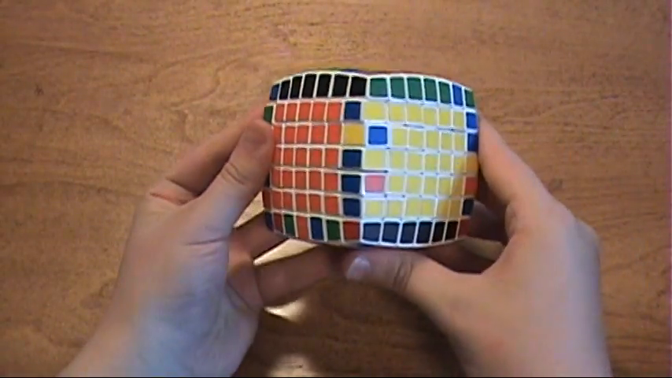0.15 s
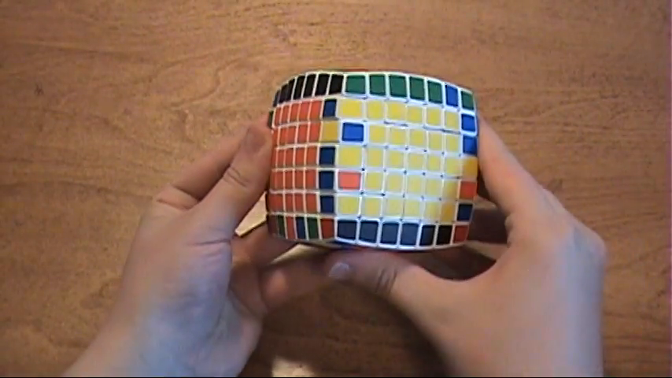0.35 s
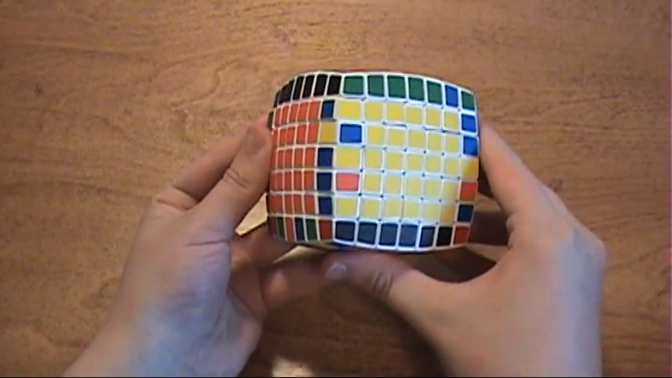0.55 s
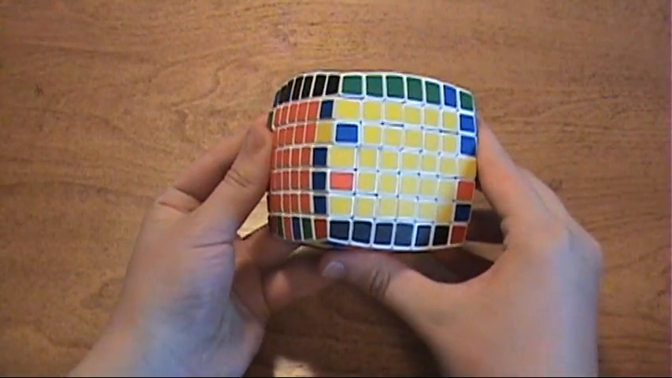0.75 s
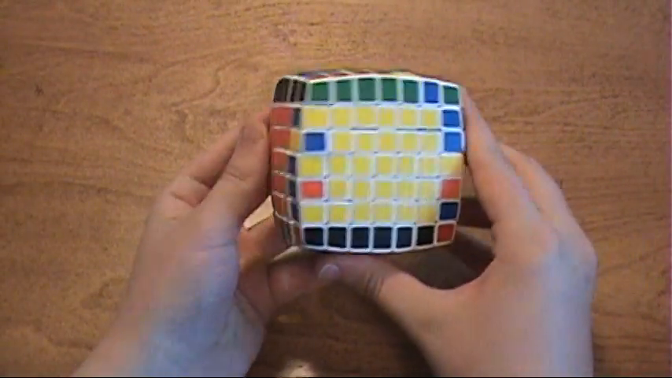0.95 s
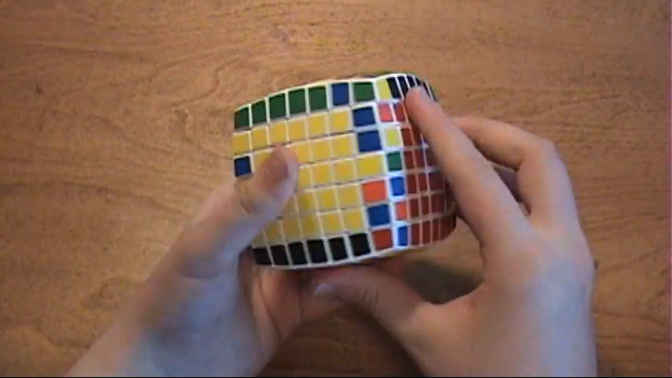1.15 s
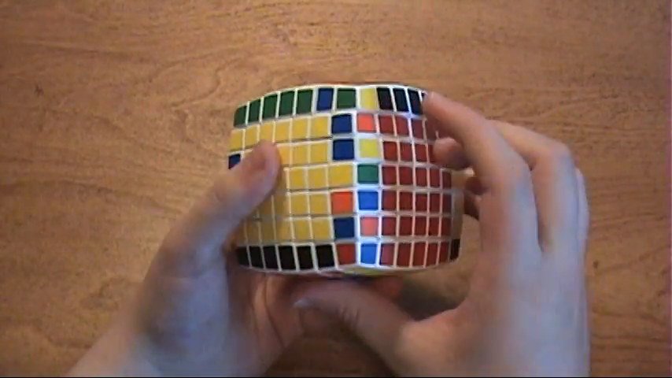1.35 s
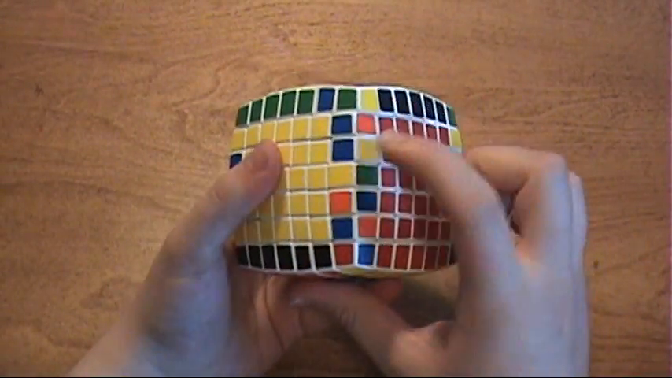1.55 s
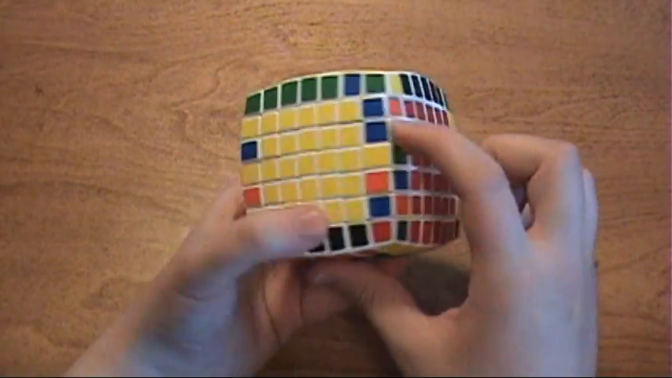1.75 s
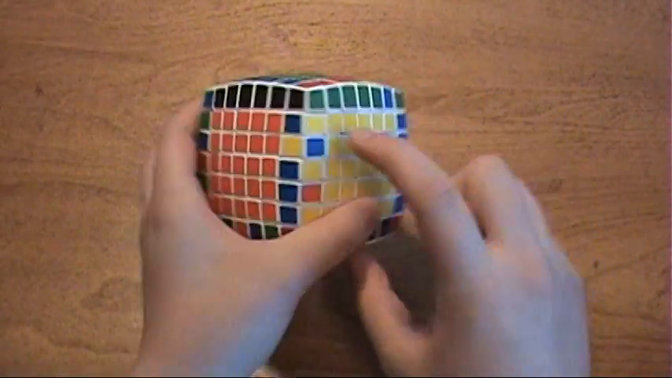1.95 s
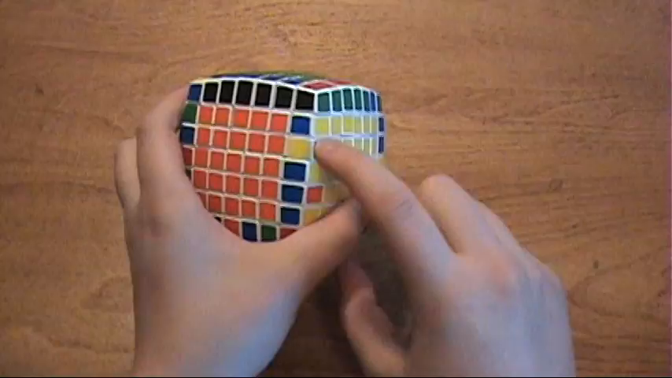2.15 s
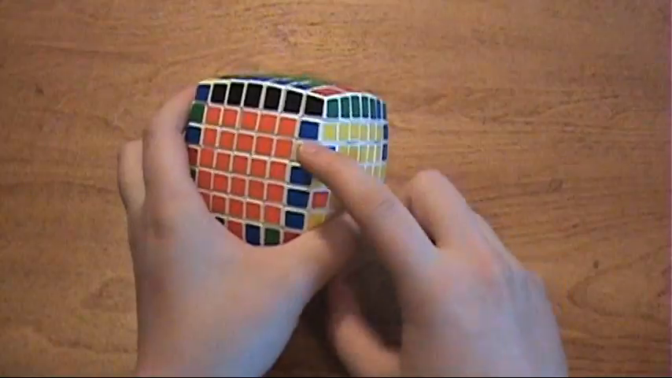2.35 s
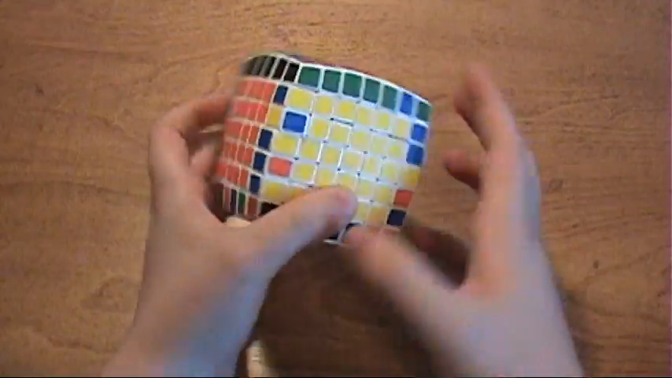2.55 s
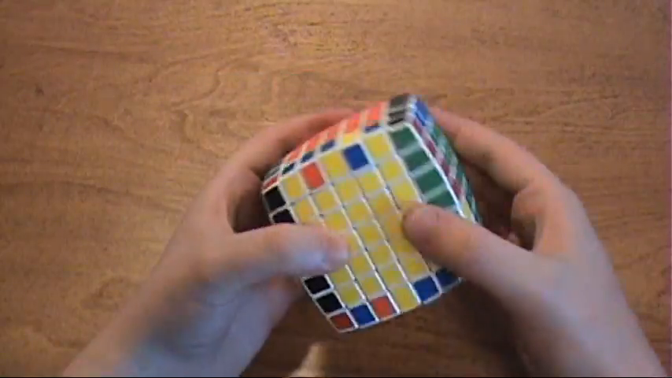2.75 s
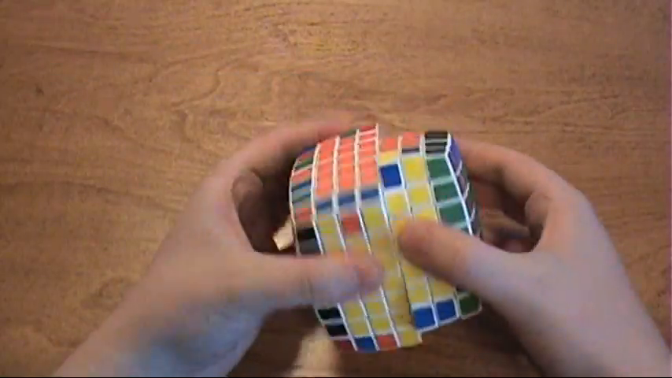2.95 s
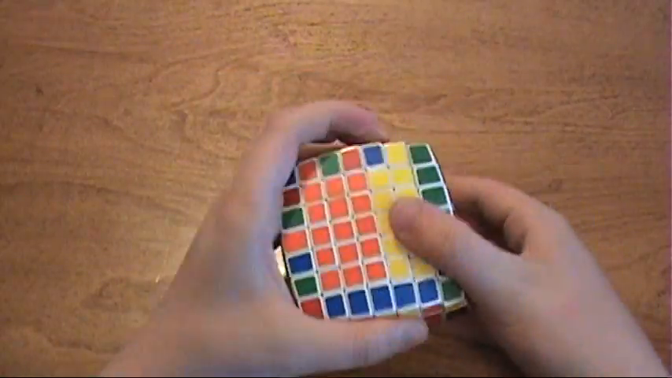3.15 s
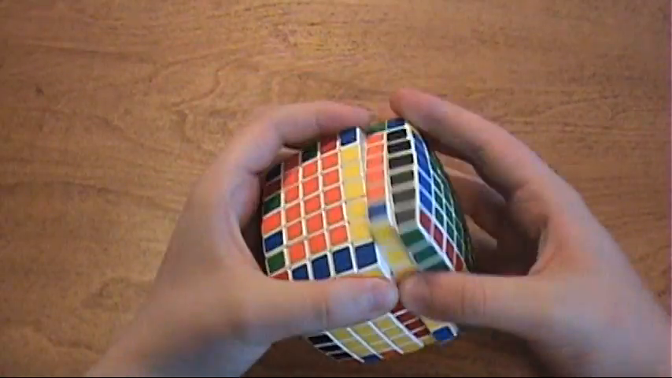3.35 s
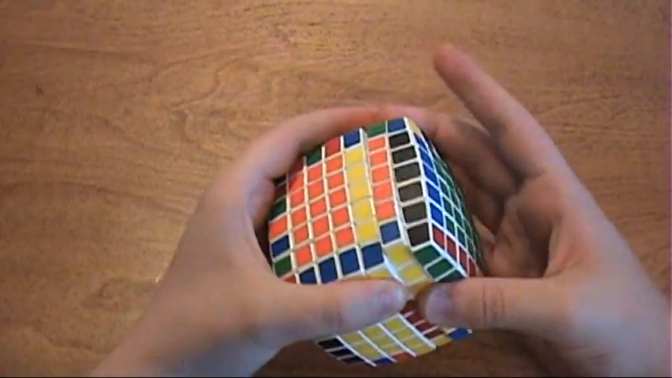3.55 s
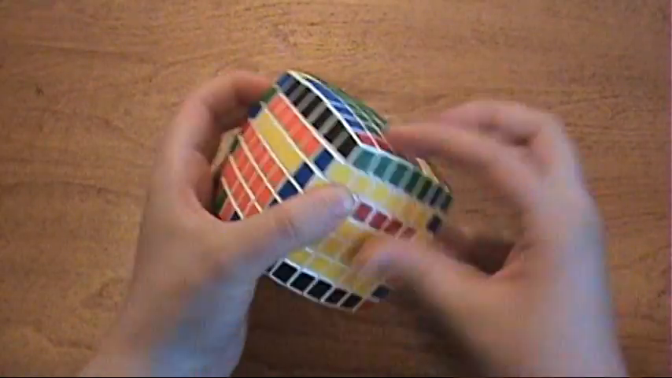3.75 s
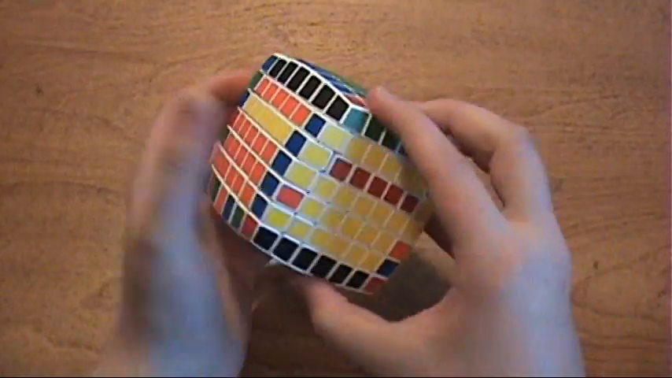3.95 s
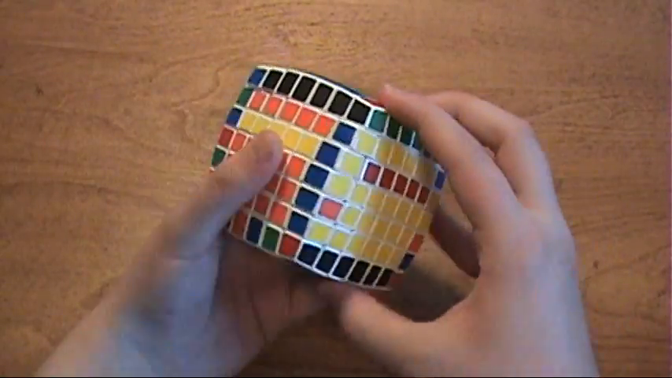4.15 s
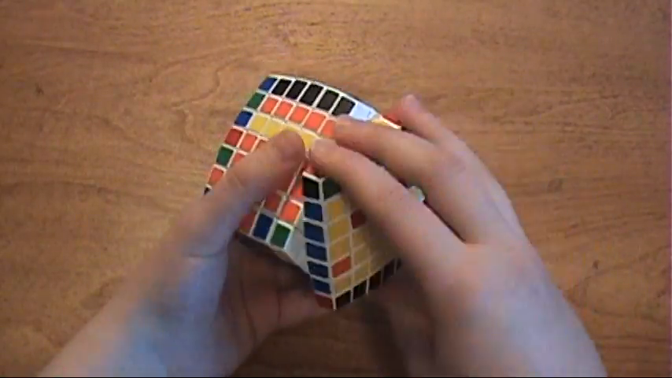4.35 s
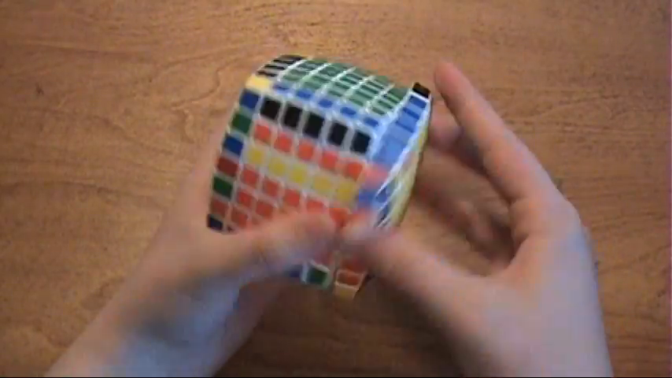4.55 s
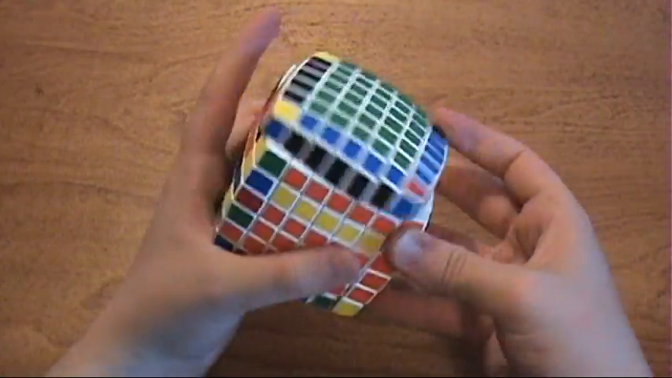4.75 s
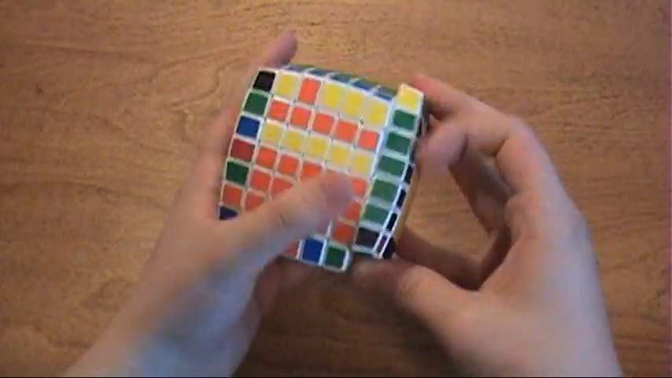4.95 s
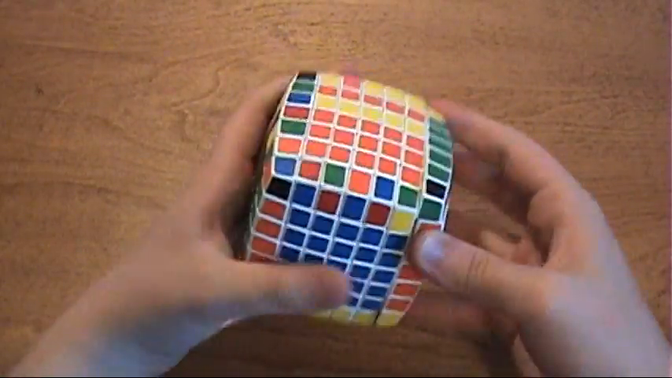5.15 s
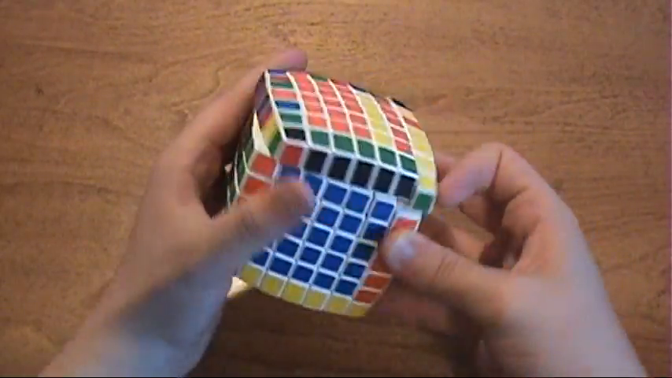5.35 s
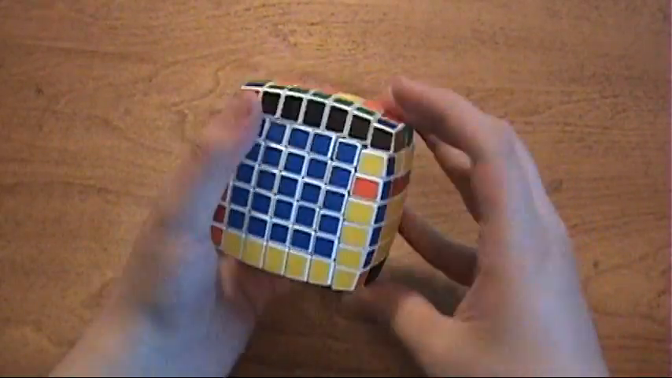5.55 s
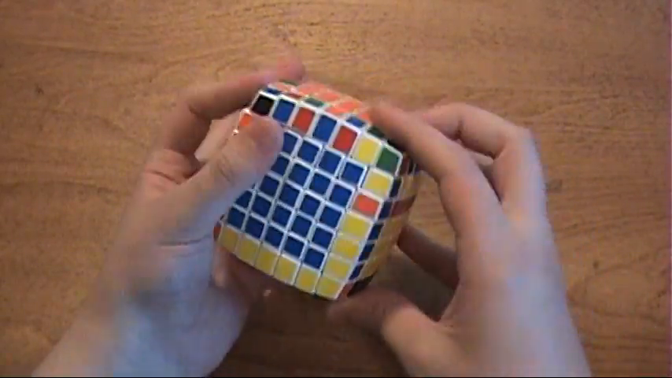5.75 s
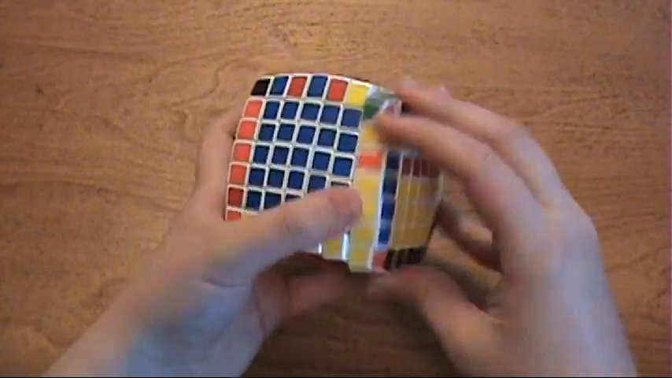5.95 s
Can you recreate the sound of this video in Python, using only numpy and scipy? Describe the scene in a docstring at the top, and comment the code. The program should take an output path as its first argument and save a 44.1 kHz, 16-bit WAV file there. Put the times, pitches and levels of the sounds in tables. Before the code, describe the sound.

Hollow, dry plastic clatter from a twisty cube, recorded near in stereo. Isolated clicks and light handling lead into crowded flurries of tiny contacts as layers grind round, with soft finger bumps between them. The strongest cracks fall late, followed by somewhat gentler rattles. A short room reflection softens each clack, over constant background hiss, low rumble, weak machine hum and a faint motor whine.

```python
"""A many-layered plastic puzzle cube is turned by hand, heard close up in a small room.
It begins with scattered soft clacks and a first sharp one; from 2.5 s the turning gets busy and fingers bump
the cube softly. The clacks are loudest from about 4.5 to 5.5 s, then ease off a little.
Each clack is a flurry of tiny contacts, a turning layer rattles many pieces, and the hollow body colours both.
The room answers with fading noise; hiss, rumble, a faint machine hum and a whine run throughout."""
import sys
import numpy as np
from scipy import signal
from scipy.fft import rfft, irfft, next_fast_len
from scipy.io import wavfile
from scipy.ndimage import uniform_filter1d, map_coordinates

SR = 44100
rng = np.random.default_rng(int(sys.argv[2]) if len(sys.argv) > 2 else 0)


def pcm_store(signal):
    """Save signal as 16-bit PCM."""
    levels = np.round(np.clip(np.atleast_2d(signal), -1, 1) * 32767)
    wavfile.write(sys.argv[1], SR, levels.astype(np.int16).T)


N = 264159
FRAME = 2048  # samples in the sound of one struck piece
LEAD = 512  # samples kept ahead of a clack's main blow, also the longest path between pieces

# Pieces knocking together. Each row: time of the main blow in seconds, level in dB averaged over 8 ms,
# hollow knock in dB, bright snap in dB, length of the flurry in ms.
CLACKS = [(0.0885, -42.5, -2, 0, 2.4), (0.134, -51, 3, -2, 1.6), (0.1987, -45, 4, -10, 1.4),
          (0.231, -51.5, -1, -13, 0.7), (0.2937, -29, 5, -1, 2.05), (0.6105, -38.5, 4, -1, 1.2),
          (0.6155, -35.5, 8, 7, 1.2), (0.6206, -30, 8, 3.5, 3.6), (0.8739, -39, 10, 0, 1.1),
          (0.9567, -40.5, 4.5, 9, 0.74), (1.0129, -41.5, 8, 17, 0.5), (1.0208, -40, -5, 8, 0.54),
          (1.0515, -48.5, 8, -1, 1.1), (1.0633, -41.5, -3, -5, 1.3), (1.0785, -45.5, -10, 10, 1.1),
          (1.159, -44.5, -3, 3, 1.6), (1.1833, -42.5, -8, 9, 0.65), (1.211, -51, 15, 11, 1.3),
          (1.771, -48.5, 4, 3, 1.9), (1.8803, -49, -13, 6, 1), (1.8957, -34, 13, 5, 1.3),
          (1.9154, -34.5, 3, 5.5, 0.67), (1.9598, -44, -8, -5, 0.8), (1.9834, -36.5, 8.5, -7, 2.2),
          (2.0207, -36.5, 0, -17, 2.7), (2.227, -53, 13, -8, 1.6), (2.5154, -37.5, 10, 22.5, 3.3),
          (2.53, -47.5, -4, 5, 0.83), (2.7568, -42.5, 2.5, -9, 2.7), (2.7965, -34, 3, 3, 1.3),
          (2.804, -33, 2, 5, 2.2), (2.909, -38, 15, 10, 0.57), (2.924, -38, 11, -1, 1.47),
          (2.9432, -33.5, -2, -26, 1.4), (2.9552, -28, 4, 2.5, 2), (3.0065, -29, -6, -24, 0.81),
          (3.0186, -27, 4, -5, 1.6), (3.0536, -28.5, 6, -4, 0.35), (3.0668, -27, 0, -10, 0.52),
          (3.0913, -30, 5, 2, 1.6), (3.1237, -34, 7, 9, 0.5), (3.2107, -32.5, 8, 0, 2.5),
          (3.2558, -26, 2, 8, 0.92), (3.277, -30, -8, 22, 0.8), (3.361, -40.5, 2, 13, 0.2),
          (3.425, -32.5, -6, -16, 3.4), (3.4692, -44, 3, -26, 1.16), (3.531, -34, -11, 7, 0.32),
          (3.5433, -38.5, 6, -11, 1.4), (3.6313, -32, -6, 4, 1.3), (3.6413, -32, -15, -1, 0.57),
          (3.691, -38.5, 3, 7, 0.7), (3.775, -38, -5, -12, 0.7), (3.8124, -38, -4, -3, 0.96),
          (3.8254, -43, 4, -1, 0.7), (3.8607, -38.5, 5, -13, 0.7), (3.8935, -39.5, 9, -22, 1.7),
          (3.913, -38, 0, 0, 1.04), (3.976, -39, 1, -5, 0.41), (4.025, -37, -9, 10, 1.1),
          (4.0347, -31.5, 4.5, 10, 1.3), (4.0984, -40, 6, -2, 0.96), (4.1223, -42, 3, -12, 0.55),
          (4.1412, -25, 7, 7, 2.2), (4.1995, -31, -5, -8, 2.2), (4.2048, -31, -2, -6, 0.89),
          (4.2944, -27, 0, 4, 1.2), (4.3249, -34.5, 4, 4, 1.21), (4.403, -43, 14, -5, 1.87),
          (4.479, -35, 13, 6, 3), (4.5037, -33.5, 16, 7, 3.3), (4.539, -24, -9, 5, 0.49),
          (4.5434, -21.5, 2, 2, 5.3), (4.5648, -21, -0.5, 1.5, 5.6), (4.5886, -25.5, -3, 3, 1),
          (4.6118, -24.5, -20, -3, 0.41), (4.6394, -22, -20, 3.5, 1.1), (4.754, -39, -1, -19, 0.4),
          (4.778, -36, -10, -1, 0.37), (4.8205, -18.5, -0.5, 5, 1.8), (4.8724, -23.5, -14, 12, 0.7),
          (4.881, -18.5, -2.5, 10.5, 0.9), (4.8927, -25, -3, 11, 1.4), (4.9029, -31, 1, -11, 1.2),
          (4.9175, -23.5, -14, 11, 1.2), (4.9248, -24, -9, 7, 1.5), (4.9311, -20.5, -7, 14, 1.2),
          (4.964, -27.5, -5, 2, 1.1), (5.011, -29, 0.5, -1, 0.7), (5.0383, -30.5, -1.5, -10, 0.9),
          (5.1062, -46, 0, -6, 0.71), (5.1846, -41, 8, -4, 0.9), (5.2184, -35.5, -8, -1, 1.04),
          (5.2489, -36, 5.5, 2, 1.06), (5.2963, -30.5, 2, 5, 2.2), (5.3256, -28.5, -7, 10, 1.97),
          (5.3902, -17, -4.5, 3.5, 1.6), (5.4622, -19.5, -3, 6.5, 1.02), (5.492, -30, -7, -8, 0.63),
          (5.5094, -31, -13, -3, 1.4), (5.5268, -29.5, -3, -14, 0.59), (5.5802, -33, 5, -10, 4.6),
          (5.6188, -31.5, 0.5, 9, 0.8), (5.6793, -27, 8, -1, 3.5), (5.7743, -30.5, 3.5, 2.5, 2.8),
          (5.8015, -36, 0, -6, 3), (5.8526, -35.5, 9, -2, 0.85), (5.89, -32.5, 3, 16, 0.53),
          (5.914, -36, -3, -8, 2.7), (5.9632, -29, -9, -8, 1.8), (5.9809, -28.5, -4, 9, 1)]


def clacks(rows, rise=0.67, strike=0.87):
    """Contacts crowd up to one main blow and thin out after it, each making a piece ring."""
    out = np.zeros(N)
    hz, colours = piece_colours(own_db=2.5, count=len(rows))
    knock = 1 / (1 + (np.log2((hz + 1) / 740) / 0.86) ** 4)  # a square blow drives the cube's lowest resonances
    snap = 1 - 1 / (1 + (hz / 5500) ** 4)  # a hard edge adds treble
    times, levels, knocks, snaps, lengths = np.transpose(rows)
    colours = colours + np.outer(knocks, knock) + np.outer(snaps, snap)
    pieces = scattered(causal(colours), spread_s=0.0003893)
    ms = (np.arange(FRAME) - LEAD) * 1000 / SR  # time from the main blow
    flurries = contacts(rate=5000, scatter_db=4.5, shape=(len(rows), FRAME))
    for start, db, length, piece, flurry in zip(times, levels, lengths, pieces, flurries):
        distance = np.maximum(ms, -ms / rise)  # the build-up is quicker than the thinning out
        force = flurry * np.exp(-distance / (2 * max(length, .1)))
        force /= np.linalg.norm(force) + 1e-12
        force[LEAD] += strike / (1 + length ** 2)  # short clacks are nearly one clean blow
        ring = signal.fftconvolve(even(force), piece)
        ring *= np.sqrt(.008 * SR) / np.linalg.norm(ring)  # same energy as 8 ms at rms 1
        add(out, amp(db) * ring, round(start * SR) - LEAD)
    return out


def contacts(rate, scatter_db, shape):
    """Random tiny impacts, rate a second, pushing either way with varying but bounded size."""
    hit = rng.random(shape) < rate / SR
    direction = np.sign(rng.standard_normal(shape))
    size = amp(scatter_db * np.clip(rng.standard_normal(shape), -2, 1.6))
    return hit * direction * size


def even(force):
    """Hard contacts push all broad bands alike, so the colour comes from the piece that is struck."""
    spectrum = rfft(force)
    broad_power = uniform_filter1d(np.abs(spectrum) ** 2, size=36)
    return irfft(spectrum / np.sqrt(np.abs(broad_power) + 1e-12))


# Resonances of the hollow cube. Each row: frequency in Hz, width in Hz, height in dB above the broad colour.
CAVITIES = [(405, 99, 3), (599, 107, 7.5), (875, 174, 11.5), (1005, 137, 8), (1440, 180, 3.5),
            (1826, 520, 4), (2460, 350, 2), (3180, 700, 2.5), (4400, 1370, 4), (5440, 300, 1),
            (6970, 2000, 4.5), (8480, 930, 2)]
# Broad colour of the plastic. Each row: frequency in Hz, level in dB per Hz.
PLASTIC = [(60, -48), (200, -12.5), (300, -12.5), (450, -5.5), (750, -8), (1250, -3), (2000, -1),
           (4300, -1), (6200, -7), (10000, -7), (12500, -14), (15000, -23.5), (16500, -43)]


def piece_colours(own_db, count):
    """Spectra of single pieces in dB: the cube's shared resonances plus narrow ones of each piece's own."""
    hz = np.fft.rfftfreq(FRAME, 1 / SR)
    body = along(PLASTIC, hz) + resonances(CAVITIES, hz)
    return hz, body + own_db * ripple(count)


def scattered(responses, spread_s, slow_hz=1200):
    """Each frequency finds its own way out between the pieces; the heavy body answers later than small parts."""
    hz = np.fft.rfftfreq(FRAME, 1 / SR)
    low_is_late = 1 + 2 / (1 + (hz / slow_hz) ** 2)
    delay_s = spread_s * (.5 + np.abs(ripple(len(responses)))) * low_is_late
    phase = -2 * np.pi * np.cumsum(delay_s, axis=1) * SR / FRAME  # adding up delays over frequency gives phase
    paths = irfft(np.exp(1j * phase))[:, :LEAD]
    return signal.fftconvolve(responses, paths, axes=1)[:, :FRAME]


# Parts of the cube that are flicked and ring at their own pitch.
# Each row: start in seconds, starting level in dB, pitch in Hz.
PINGS = [(0.292, -19, 3880), (0.294, -30, 930), (0.618, -34, 610), (2.513, -33.5, 4320),
         (2.529, -30.5, 4300), (3.531, -36, 4270), (3.813, -27.5, 3220), (3.975, -24.5, 1770),
         (4.14, -15, 1830), (4.901, -21, 3700), (4.924, -13, 3600), (5.389, -17.5, 1901)]


def pings(decay_s=0.0013, rough=0.64):
    """Plastic rings for only a few milliseconds, and never purely."""
    out, t = np.zeros(N), np.arange(SR // 25) / SR
    for start, db, hz in PINGS:
        drift = rough * unit(uniform_filter1d(rng.standard_normal(len(t)), size=60))
        ring = np.exp(-t / decay_s) * np.sin(2 * np.pi * hz * t + drift)
        add(out, amp(db) * ring, round(start * SR))
    return out


# Pushes that slide a layer round. Each row: start in seconds, length in seconds, relative level in dB,
# swell from start to end in dB, hollow drone in dB, gritty edge in dB.
TURNS = [(0.968, 0.12, -48.5, 0, 0, 0), (1.159, 0.066, -50, -3, 6, -4), (1.864, 0.057, -44.5, -2, -2, -1.5),
         (1.972, 0.047, -46.5, 6, 1, -1.5), (2.505, 0.022, -45.5, -2, 0, -0.5),
         (2.801, 0.008, -39, 3, 0.5, 2), (2.91, 0.035, -44.5, -5, -2, -1), (2.97, 0.12, -32.5, 1, 5.5, -4),
         (3.107, 0.069, -42.5, 3, 5, -7), (3.201, 0.068, -28.5, 7.5, 1.5, 0),
         (3.295, 0.018, -41, -3, 2, -2), (3.384, 0.036, -38, 3.5, 2.5, -4.5),
         (3.625, 0.019, -35, -1, 1, -1), (3.725, 0.046, -41.5, 5, 5.5, 1), (3.916, 0.02, -43.5, 2, 1, -3),
         (4.037, 0.02, -44.5, -6, 5, 1), (4.144, 0.0088, -40, 3, 4, 1), (4.242, 0.082, -31.5, 2, 3.5, 3),
         (4.465, 0.074, -35, 0, 3, 0.5), (4.545, 0.106, -31, -2, 1.5, 3), (4.735, 0.068, -42.5, 7, 0, 0),
         (4.815, 0.11, -28, 6, -1.5, 5.5), (4.94, 0.072, -30, -4, -2, 1.5),
         (5.146, 0.071, -38.5, -6, -4, 2.5), (5.3, 0.103, -28, -4.5, -2, 2),
         (5.449, 0.033, -25.5, -5.5, -6, -1.5), (5.491, 0.092, -35, 2.5, -3.5, -1),
         (5.662, 0.041, -25.5, -1.5, -1, -1), (5.846, 0.013, -36, -7, 1, -2),
         (5.941, 0.044, -35.5, -1, -1.5, 6.5)]
ATTACK_DB_PER_S, RELEASE_DB_PER_S = 882, 340  # how fast a layer gets going, and how fast its pieces settle
# From this time the pieces never quite rest, ever less so: start, first relative level, growth.
FIDGET_FROM_S, FIDGET_DB, FIDGET_DB_PER_S = 2.6, -57, 3.5


def turning():
    """Pushes start fast, swell or ease, then settle; the loudest one sets the level, hollow and edge in dB."""
    t = np.arange(N) / SR
    busy_s = t - FIDGET_FROM_S
    loudest = FIDGET_DB + np.minimum(FIDGET_DB_PER_S * busy_s, ATTACK_DB_PER_S * busy_s)
    hollow_db, edge_db = np.zeros(N), np.zeros(N)
    for start, length, db, swell, hollow, edge in TURNS:
        age = t - start
        held = db + swell * (np.clip(age / length, 0, 1) - .5)
        attack = ATTACK_DB_PER_S * np.minimum(age, 0)
        release = RELEASE_DB_PER_S * np.maximum(age - length, 0)
        level = held + attack - release
        leads = level > loudest
        loudest[leads], hollow_db[leads], edge_db[leads] = level[leads], hollow, edge
    return loudest, hollow_db, edge_db


# Colour of the rattle against the clacks: a little less bass and treble, slightly more around 500 Hz.
# Each row: frequency in Hz, change of colour in dB.
RATTLE_COLOUR = [(200, -1.6), (500, 0.7), (900, -0.28), (8000, -1.2), (14000, -1.5)]


def rattle(level_db=-2, slow_tilt_db=-3, count=8):
    """A sliding layer shakes many loose pieces; a gentle turn sounds duller than a fast one."""
    turn_db, hollow_db, edge_db = turning()
    hz, colours = piece_colours(own_db=4, count=count)
    colours = colours + along(RATTLE_COLOUR, hz)
    pieces = scattered(causal(colours), spread_s=0.000295)
    busy = amp(4.2 * np.array([wobble(45) for _ in range(count)]))  # now one piece chatters most, now another
    taps = busy * contacts(rate=260, scatter_db=3.5, shape=(count, N))
    chatter = unit(signal.fftconvolve(taps, pieces, axes=1)[:, :N].sum(0))
    dull = filtered(chatter, lambda f: amp(slow_tilt_db * np.log2(1 + f / 5000)))
    speed = np.clip((turn_db + 57) / 24, 0, 1)  # louder turns count as faster
    slide = speed * chatter + (1 - speed) * dull
    hollow = (amp(hollow_db) - 1) * band(slide, hz=950, width_hz=540)
    edge = (amp(edge_db) - 1) * band(slide, hz=3750, width_hz=1300)
    catching = unit(amp(1.74 * wobble(200)))  # edges catch and let go in clumps
    return amp(turn_db + level_db) * catching * (slide + hollow + edge)


LOOSE_PER_S, LOOSE_DB, LOOSE_SCATTER_DB = 45, -2, 2  # stray clicks: rate, level over the turn, spread
LOOSE_KNOCK_DB, LOOSE_SNAP_DB, LOOSE_COLOUR_DB = -0.5, 1, 6  # usual hollow knock and bright snap, their spread
LOOSE_MS = 0.92  # length of each click's flurry


def stray_clicks(count=8):
    """Loose pieces catch unevenly during each turn, as hard as it is pushed; gives rows like the clacks."""
    rows = []
    chances = rng.uniform(-1, 1, (len(TURNS), count, 4))
    for (start, length, db, swell, _, _), draws in zip(TURNS, chances):
        for k, (early, size, knock, snap) in enumerate(draws):
            age = (k + .5 + early / 2) / LOOSE_PER_S
            level = db + swell * (age / length - .5) + LOOSE_DB + LOOSE_SCATTER_DB * size
            knock_db = LOOSE_KNOCK_DB + LOOSE_COLOUR_DB * knock
            snap_db = LOOSE_SNAP_DB + LOOSE_COLOUR_DB * snap
            if age < length:
                rows.append((start + age, level, knock_db, snap_db, LOOSE_MS))
    return rows


# Fingers taking a new grip. Each row: start in seconds, level at the peak in dB, middle pitch in Hz,
# time to the peak in seconds.
BUMPS = [(2.568, -56, 340, 0.0076), (3.632, -47, 260, 0.006), (3.65, -46.5, 135, 0.0066),
         (3.961, -36, 301, 0.0033), (3.972, -41, 224, 0.0039), (4.086, -46.5, 238, 0.0098),
         (4.109, -39.5, 190.4, 0.0038), (4.123, -43.5, 134, 0.01)]


def fingers(sag=0.53, rough=0.43):
    """Soft flesh on the cube: a few uneven low cycles that sink in pitch as the grip settles."""
    out, t = np.zeros(N), np.arange(SR // 6) / SR
    for start, db, hz, length in BUMPS:
        u = t / length
        pitch = hz * (1 + sag * (np.exp(-u / 2) - .5))
        phase = 2 * np.pi * np.cumsum(pitch) / SR
        swell = u * np.exp(1 - u)
        add(out, amp(db) * swell * np.sin(phase + rough * wobble(194)[:len(t)]), round(start * SR))
    return out


# How long the room rings. Each row: frequency in Hz, time to fall by 60 dB in seconds.
RING_TIMES = [(200, 0.37), (800, 0.37), (2500, 0.19), (6000, 0.2), (14000, 0.11)]
# How wide the room sounds. Each row: frequency in Hz, side over middle in dB.
ROOM_WIDTH = [(300, -4), (1000, -10), (2000, -6), (4000, -1.5), (9000, -4)]


def tails(build_s=0.0019):
    """A left and right room tail of noise, each frequency dying at its own speed."""
    hz, t, z = signal.stft(rng.standard_normal((2, SR // 3)), SR, nperseg=256)
    decay = amp(-60 * t / along(RING_TIMES, hz)[:, None])
    z = z * decay * (1 - np.exp(-t / build_s))
    z[1] *= amp(along(ROOM_WIDTH, hz))[:, None]
    mid, side = signal.istft(z, SR, nperseg=256)[1]
    return np.array([mid + side, mid - side]) / np.linalg.norm(mid)


# Colour of the room's answer. Each row: frequency in Hz, relative level in dB.
ROOM_COLOUR = [(300, 1), (1000, -3.5), (2500, 1.5), (4000, -1.5), (8000, 1), (14000, -5)]


def room(x, count=12):
    """The room's answer changes as the hands move the cube about: one tail fades into the next."""
    place = np.arange(N) / SR * 12 % count  # 12 tails a second, used in a circle
    wet = np.zeros((2, N))
    for k in range(count):
        away = np.abs((place - k + count / 2) % count - count / 2)
        share = np.sqrt(np.clip(1 - away, 0, 1))
        wet += signal.oaconvolve((x * share)[None], tails(), axes=1)[:, :N]
    return filtered(wet, lambda hz: amp(along(ROOM_COLOUR, hz)))


# Likeness of left and right in the background noise. Each row: frequency in Hz, likeness
# (1 the same, 0 unrelated, negative opposed).
ALIKE = [(60, 1), (180, -0.59), (550, -0.48), (1650, -0.23), (4970, -0.09), (15000, 0.96)]


def noise(spectrum, peaks=()):
    """Stereo noise of rms 1: the mix of middle and side sets how alike left and right are."""
    def mid_and_side(hz):
        gain = amp(along(spectrum, hz) + resonances(peaks, hz))
        angle = np.arccos(np.clip(along(ALIKE, hz), -1, 1)) / 2
        return gain * np.array([np.cos(angle), np.sin(angle)])

    mid, side = filtered(rng.standard_normal((2, N)), mid_and_side)
    return unit(np.array([mid + side, mid - side]))


def tones(rows, drift):
    """Steady tones with gently wandering phase."""
    t = np.arange(N) / SR
    out = np.zeros(N)
    for hz, db in rows:
        out += np.sqrt(2) * amp(db) * np.sin(2 * np.pi * hz * t + drift * wobble(5.3))
    return out


# Shapes of the hiss and the rumble. Each row: frequency in Hz, relative level in dB per Hz.
HISS = [(200, -9), (450, -5.5), (760, 0), (1150, -3), (1600, -7), (2300, -6), (3600, -12), (5000, -14.5),
        (8000, -15), (9300, -22.5), (11500, -24), (14000, -35), (16000, -42)]
RUMBLE = [(20, -28), (40, -16), (60, -14), (85, -5.5), (130, 8), (190, -3.5), (260, 5.5), (500, -48)]
# Narrow bands where the hiss sings, or dips. Each row: frequency in Hz, width in Hz, height in dB.
HISS_PEAKS = [(3270, 120, 3), (5450, 300, 7), (6680, 350, 8.5), (7130, 320, -3), (7630, 320, 6.5),
              (10230, 710, 5.5)]
# Tones of the machine hum and the motor whine. Each row: frequency in Hz, relative level in dB.
HUM = [(59.5, -65.5), (62.5, -70.5), (87, -67), (106, -77), (120, -70.5), (180, -66.5), (300, -72)]
WHINE = [(2175, -71), (2630, -73), (3085, -70), (3277, -70.5), (6362, -71.5)]


def background(hum_db=-1, whine_db=-1):
    """Hiss and rumble, with a slowly beating hum and a thin motor whine."""
    air = amp(-52.5) * noise(HISS, HISS_PEAKS) + amp(-60.5) * noise(RUMBLE)
    hum = amp(hum_db) * tones(HUM, drift=1.0)
    whine = amp(whine_db) * tones(WHINE, drift=2.4)
    return air + hum + whine


def amp(db):
    """Decibels to gain."""
    return 10 ** (np.asarray(db) / 20)


def unit(x):
    """Scale to rms 1."""
    return x / np.sqrt(np.mean(x ** 2) + 1e-20)


def along(points, hz):
    """Rows of frequency and value, read between the points on a log frequency axis."""
    f, v = np.transpose(points)
    return np.interp(np.log(hz + 1), np.log(f), v)


def resonances(rows, hz):
    """Rounded peaks over frequency, added up in dB."""
    return sum(db / (1 + (2 * (hz - f) / width) ** 2) for f, width, db in rows)


def ripple(count):
    """Random curves over frequency, rms 1, with bumps a few hundred Hz wide."""
    rough = rng.standard_normal((count, FRAME // 2 + 1))
    return unit(uniform_filter1d(uniform_filter1d(rough, size=14, axis=1), size=8, axis=1))


def wobble(rate):
    """A smooth random curve through rate random points a second."""
    points = rng.standard_normal(int(N * rate / SR) + 4)
    return map_coordinates(points, [np.arange(N) * rate / SR])


def filtered(x, response):
    """Multiply the spectrum of x by a response of frequency."""
    m = next_fast_len(N + SR // 2)  # spare room so that nothing wraps round to the start
    return irfft(rfft(x, m) * response(np.fft.rfftfreq(m, 1 / SR)), m)[..., :N]


def band(x, hz, width_hz):
    """The part of x around one frequency."""
    return filtered(x, lambda f: 1 / (1 + (2 * (f - hz) / width_hz) ** 4))


def causal(db):
    """Impulse responses that start at once and have these dB spectra."""
    cepstrum = irfft(np.log(np.maximum(amp(db), 1e-6)))
    cepstrum[..., 1:FRAME // 2] *= 2  # fold the backward half onto the forward half
    cepstrum[..., FRAME // 2 + 1:] = 0
    return irfft(np.exp(rfft(cepstrum)))


def add(track, sound, start):
    """Mix a sound into a track from a sample on, cutting what falls outside."""
    part = track[max(start, 0):max(start + len(sound), 0)]
    part += sound[max(-start, 0):][:len(part)]


# Lean of the whole sound. Each row: frequency in Hz, left minus right in dB.
BALANCE = [(250, 2.5), (1000, 1.7), (2000, 2), (4000, -0.2), (12000, -1.5)]


def scene():
    """The cube close up with the room and hum around it, low notes leaning left."""
    air = background()
    cube = clacks(CLACKS) + pings() + rattle() + fingers() + clacks(stray_clicks())
    mix = cube + amp(-10.5) * room(cube) + air
    return filtered(mix, lambda hz: amp(np.outer([.5, -.5], along(BALANCE, hz))))


def record(dry):
    """Nothing from 16000 Hz up is kept."""
    return filtered(dry, lambda hz: hz < 16000)


dry = scene()
out = record(dry)
pcm_store(out)
```